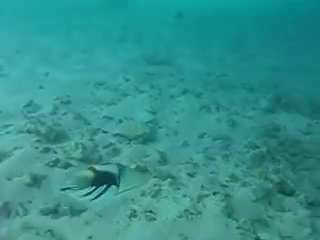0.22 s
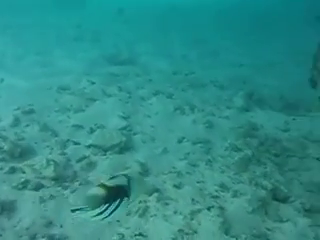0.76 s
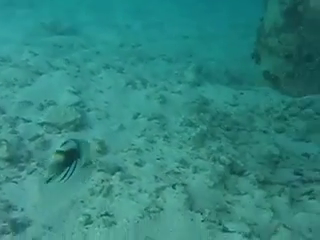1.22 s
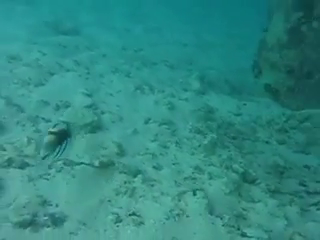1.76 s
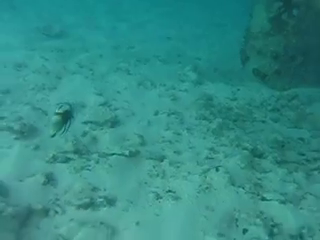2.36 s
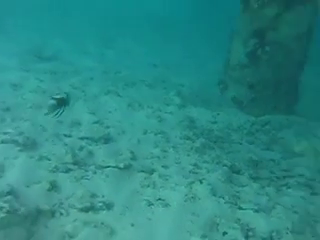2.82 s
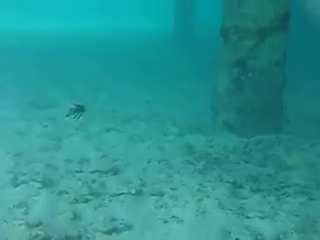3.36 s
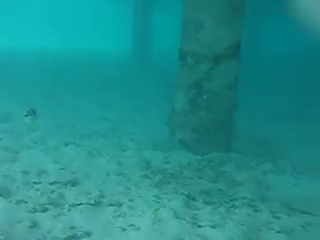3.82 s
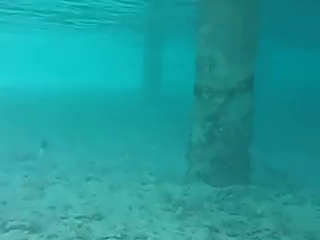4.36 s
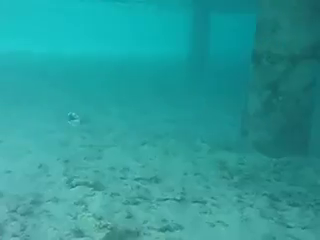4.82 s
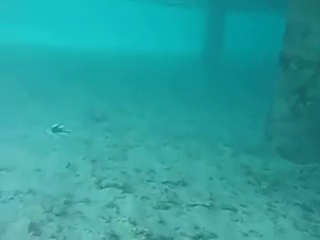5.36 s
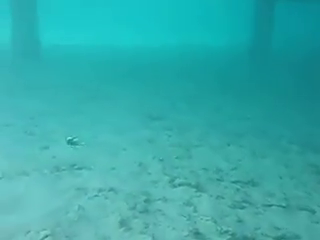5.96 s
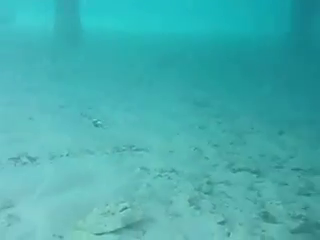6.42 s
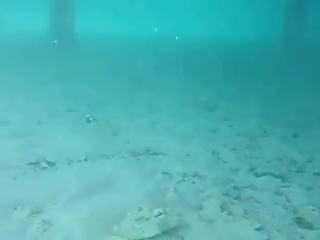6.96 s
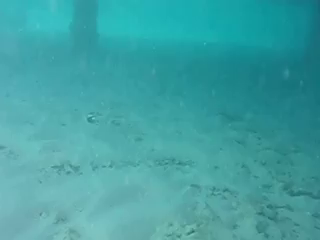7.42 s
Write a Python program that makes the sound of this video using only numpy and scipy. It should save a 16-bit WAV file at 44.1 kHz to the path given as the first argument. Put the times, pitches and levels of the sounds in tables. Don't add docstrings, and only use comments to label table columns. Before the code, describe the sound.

Close, muffled underwater sound from a microphone sealed inside a housing. Hollow knocks and soft finger slips ring briefly on a low boxy note, over faint hiss and sparse shrimp clicks. Knocks cluster between three and a half and five seconds, with one hard buckle clack. Rubbing then thickens, and after six seconds a loud fluttering gurgle fills the housing before dropping to a few taps and weak water drag.

```python
import sys
import numpy as np
from scipy import signal
from scipy.fft import rfft, irfft
from scipy.io import wavfile
from scipy.ndimage import uniform_filter1d

SR = 44100
rng = np.random.default_rng(int(sys.argv[2]) if len(sys.argv) > 2 else 0)


def file_out(sig):
    cols = np.atleast_2d(sig).T
    lim = np.clip(cols, -1, 1)
    pcm = np.round(lim * 32767).astype(np.int16)
    wavfile.write(sys.argv[1], SR, pcm)


def invert_db(level):
    return 10 ** (np.asarray(level, dtype=float) / 20)


N = 339570

# pitch_hz, level_db (per Hz)
HISS = [
    (45, -10),
    (150, 1.5),
    (500, 5.5),
    (950, -4.5),
    (2000, -6.5),
    (3600, -4.5),
    (4050, -4.5),
    (4500, -12.5),
]
# start_s, peak_db
SNAPS = [(.098, -17), (0.2547, -18.5), (1.1065, -32.5), (1.909, -31.5), (2.0866, -18), (2.156, -31.5),
         (2.5057, -17.5), (2.8949, -16.5), (3.5159, -32), (3.536, -17), (3.562, -18.5), (3.7916, -28),
         (3.7942, -24.5), (3.801, -31), (3.866, -33), (3.889, -17), (4.1168, -32), (4.2143, -18.5),
         (4.266, -35), (4.804, -34), (5.3162, -17), (5.8143, -33), (5.8713, -30.5), (5.9394, -39),
         (5.951, -28), (6.7538, -18.5), (6.804, -16.5)]
# start_s, peak_db, pitch_hz
GRIT = [(0.6823, -28.5, 1190), (0.7577, -29, 1050), (0.783, -33, 1480), (0.794, -30, 1020),
        (0.856, -21, 1100), (0.9323, -22.5, 1330), (1.017, -28, 1360), (2.0792, -27, 1220),
        (2.1203, -20, 1750), (2.758, -26, 1350), (2.775, -29, 1260), (1.555, -31, 1290), (1.62, -32, 2300),
        (1.675, -32.5, 2180), (2.839, -21.5, 1900), (3.1375, -26.5, 2320), (3.2024, -25.5, 1090),
        (3.413, -24.5, 1500), (4.309, -23.5, 1135), (4.45, -23, 1580), (0.745, -28.5, 1700),
        (1.102, -32, 1800), (1.282, -33, 1900), (3.378, -30.5, 1400), (5.375, -31, 1600),
        (5.427, -27.5, 1650), (5.813, -25, 1350), (5.93, -28.5, 1300), (5.986, -31, 1420),
        (5.866, -24, 1200), (6.643, -13, 1340),
        (0.445, -32, 1946), (0.856, -36.0, 1956.0), (0.878, -35, 1900), (0.902, -35, 1990),
        (0.971, -30, 2050), (1.616, -29, 2377.0), (1.817, -31, 2700), (2.079, -32, 2354.0),
        (2.565, -28, 2264.0), (5.953, -26, 2800), (3.126, -28, 2432.0), (3.737, -25, 2196),
        (3.791, -30, 2593.0), (4.117, -32.5, 2967.0), (4.729, -27.5, 1920), (4.778, -30.5, 2430),
        (5.654, -31.5, 2322.0), (5.872, -31.5, 2900), (6.111, -28.5, 2200), (6.122, -29.5, 2258.0),
        (6.137, -26, 2320), (6.234, -33.0, 2253.0), (6.244, -30.5, 2256.0), (6.292, -31, 2480),
        (6.335, -31, 2192.0), (6.346, -21.5, 2455.0), (6.355, -27.5, 2147.0), (3.792, -27, 1500),
        (3.7952, -27, 1600), (0.02, -27, 1000), (0.122, -29, 950)]
# start_s, peak_db, start_hz, end_hz, fade_ms (time to fall 60 dB)
BUBBLES = [
    (.301, -35.5, 2050, 1800, 30),
    (.3885, -25.5, 2280, 2050, 37),
    (1.534, -20.5, 878, 700, 100),
    (2.589, -26, 896, 797, 64),
    (2.598, -25, 1514, 1360, 52),
]
# start_s, peak_db
CLACK = (4.3443, 2.2)
# pitch_hz, level_db, fade_s (time to fall 60 dB)
CLACK_MODES = [
    (480, -2, 0.047),
    (663, -5.5, 0.039),
    (1722, -1, 0.023),
    (2865, 0.5, 0.01),
    (2050, -16, 0.014),
    (3660, -21, 0.021),
    (1200, -8, 0.015),
]
# start_s, peak_db, start_hz, end_hz, length_ms
GULPS = [(.012, -32.5, 690, 674, 15), (.338, -24.5, 736, 720, 12), (1.356, -21, 488.6, 513, 46),
         (1.815, -5.5, 556, 448, 30.5), (1.82, -32.5, 1338, 1350, 27), (2.459, -25.5, 175, 180, 29),
         (2.911, -16.5, 324, 402, 34), (2.915, -23.5, 496, 765, 25), (2.99, -34.5, 790, 875, 35),
         (3.042, -24, 265, 379, 42), (3.15, -13.5, 377, 340, 19), (3.369, -30.5, 190, 190, 15),
         (4.123, -16, 950, 950, 6.5), (3.8245, -8, 680, 636, 6.3), (5.785, -29, 108.4, 100, 12.4),
         (1.808, -16.5, 746, 694, 25.4), (6.05, -18.5, 699, 670, 50), (2.752, -25, 750, 680, 9.4),
         (7.218, -34, 156, 160, 80), (7.505, -15.5, 344.5, 283, 82), (7.569, -27, 281, 348, 76)]
# start_s, peak_db, pitch_hz,
# length_ms
THROBS = [(1.985, -10, 443, 22.4), (2.034, -13, 444, 32), (2.817, -9.5, 457, 30), (2.834, -15.5, 462, 38),
          (3.063, -5.5, 436, 21), (3.075, -5.5, 439, 21), (3.119, -7.5, 514, 40), (5.165, -11, 445, 27),
          (5.202, -12, 442, 25), (5.408, -8, 428, 38), (5.748, -7, 463, 19), (5.761, -6, 459.5, 24),
          (6.056, -6, 407, 25), (6.192, -5, 469, 17), (6.229, -4, 462, 18), (6.24, -3, 450, 20),
          (6.263, -4.5, 412, 12), (6.273, -3.5, 454, 13), (6.298, -4, 473, 33), (6.329, -8.5, 446, 11),
          (6.3625, -3.5, 432, 16), (6.394, -1, 467.5, 25), (6.4104, -2.5, 437, 11), (6.4196, -1, 449, 14),
          (6.451, -1, 451, 24), (6.487, -3.8, 475, 14), (6.501, -3.5, 422, 16), (6.521, -1, 450, 12),
          (6.5285, -0.4, 464, 11), (6.552, -2.5, 431, 18), (6.587, -11, 495, 20), (6.602, -1.5, 464, 18),
          (6.669, -3.6, 444, 29), (6.7, -2.5, 470, 24), (6.739, -3.5, 481, 20.6), (6.7527, -1.6, 458.5, 22),
          (0.033, -17, 438, 13.5), (0.156, -18, 440.0, 13.4), (0.287, -20.5, 464, 25),
        (0.785, -16.5, 513, 17), (0.935, -10, 492, 11.3), (1.373, -13.5, 482, 21.7), (1.658, -19, 519, 27),
        (1.77, -18.5, 510, 10.4), (1.943, -17.5, 469, 18), (1.972, -18, 435, 12), (2.118, -18, 456, 14),
        (2.146, -22, 430, 18), (2.178, -24, 460, 18), (2.384, -14.5, 449, 18), (2.464, -11, 444, 17),
        (2.503, -11, 425, 18), (2.566, -8.5, 438, 16.7), (2.589, -10.5, 443, 12.0),
        (2.609, -12.5, 415.0, 18.4), (2.896, -20.5, 456, 13), (3.028, -13, 466, 17),
        (3.177, -13.5, 414, 15), (3.273, -8.5, 460, 14.4), (3.292, -13, 451, 25.0),
        (3.596, -17, 488.0, 12.4), (3.631, -16.0, 480, 17), (4.069, -13.5, 480, 17), (4.291, -20, 493, 27),
        (4.496, -20, 455, 28), (4.885, -17, 478, 28), (5.342, -17.5, 446, 27), (5.728, -11.5, 464, 8.8),
        (5.787, -8, 494, 15), (5.907, -21, 477, 18), (6.127, -7.5, 466, 14.4), (6.165, -4.5, 446, 9.9),
        (6.347, -3, 424, 19.0), (6.638, -6, 430, 24), (6.722, -10, 451, 22), (6.821, -9.5, 462, 15.0),
        (7.028, -13, 483, 35), (7.066, -18, 495.0, 11), (7.16, -16.5, 480, 41), (7.254, -14, 464, 16.4),
        (7.549, -6, 463, 17), (7.657, -19.5, 430, 30)]
# start_s, peak_db, pitch_hz, length_ms
LUMPS = [(0.176, -30, 203.0, 11), (0.811, -24.5, 199, 14), (1.376, -27, 246, 13), (1.822, -16, 223.6, 14),
         (3.04, -27.5, 272, 69), (3.174, -28, 213.0, 12), (3.672, -27, 244, 25), (4.511, -22, 178.0, 10),
         (4.529, -27, 196, 15), (5.464, -28.5, 274, 48), (5.59, -28.5, 243, 11), (5.788, -25, 220, 14),
         (6.093, -28, 254, 26), (6.12, -29.5, 262, 38), (6.288, -21, 224.0, 11), (6.508, -29.5, 230.5, 14),
         (6.533, -20.5, 235.0, 18.0), (6.63, -24.5, 263.0, 41), (6.686, -24, 250.0, 20),
         (6.746, -26, 237, 30), (6.83, -25.5, 206.0, 11), (7.611, -28.5, 254.0, 36)]
# start_s, peak_db, length_ms
FLARES = [(0.762, -20.5, 15.5), (0.778, -25.5, 12.6), (0.9, -19, 13), (0.921, -15, 11.5),
          (1.372, -26.5, 16), (1.567, -25.5, 11.5), (1.657, -25, 13.5), (2.555, -18.5, 37),
          (2.895, -24, 9.9), (2.987, -26.5, 28), (3.065, -18, 13), (3.123, -28.0, 13), (3.319, -21, 16),
          (3.778, -22, 14), (4.138, -27.5, 11), (4.439, -27, 31), (4.472, -28, 16), (4.632, -21.5, 12),
          (4.773, -19.5, 15), (5.346, -29, 12), (5.37, -23, 16), (5.393, -22, 16), (5.429, -21, 13),
          (5.469, -19, 13), (5.573, -19.5, 42), (5.604, -28, 9.5), (5.711, -26, 18), (5.739, -26, 35),
          (5.811, -16.5, 27), (5.869, -24, 13.0), (6.036, -31.5, 27.0), (6.205, -19, 47), (6.232, -18, 33),
          (6.285, -22.5, 43), (6.315, -21.5, 19), (6.488, -18.5, 36), (6.523, -17, 16), (6.686, -24, 16),
          (6.699, -18.5, 20), (7.119, -28, 8.1), (7.421, -22, 16)]
# pitch_hz, width_hz, level_db
POCKET = [
    (463.2, 55.3, 1),
    (415, 75.7, -1.5),
    (676, 51, -15),
    (316.4, 26, -16.5),
    (810, 9.4, -33),
]
# pitch_hz, width_hz, level_db
SHELL = [
    (1114, 67, 6.5),
    (1340, 300, 4),
    (1484, 78, 6.5),
    (2013, 100, -1.5),
    (2420, 50, -12),
    (1900, 1800, -8),
]
# start_s, length_s, pocket_db, rasp_db
STROKES = [(0.0, 0.11, -35, -60.5), (0.207, 0.02, -32.5, -64.5), (0.34, 0.21, -36, -67.5),
           (0.726, 0.18, -23.5, -48), (0.967, 0.14, -32, -61), (1.295, 0.053, -39, -62),
           (1.455, 0.16, -33.5, -53), (1.782, 0.051, -19.5, -55), (1.886, 0.39, -30.5, -56),
           (2.345, 0.15, -27, -62), (2.443, 0.12, -26, -52.5), (2.742, 0.028, -24.5, -64),
           (2.925, 0.16, -20.5, -59.5), (3.082, 0.21, -23.5, -57), (3.364, 0.31, -32, -64),
           (3.822, 0.3, -32.5, -60.5), (4.01, 0.12, -22, -50.5), (4.192, 0.11, -38, -50.5),
           (4.398, 0.16, -31.5, -51.5), (4.61, 0.24, -29, -52.5), (4.82, 0.43, -26.5, -57),
           (5.277, 0.082, -23.5, -55.5), (5.359, 0.26, -17, -42), (5.658, 0.12, -18.5, -48),
           (5.74, 0.12, -20.5, -48.5), (6.016, .12, -17, -39.5), (6.152, 0.19, -9.5, -36.5),
           (6.368, 0.36, -11, -39.5), (6.748, 0.035, -27, -52), (6.94, 0.44, -27, -56.5),
           (7.487, 0.09, -17, -56.5)]
# start_s, length_s, level_db
HUM_SPELL = (6.92, 0.46, -55.5)
BLIP_HZ = (950, 1350, 1900, 2370)
# start_s, peak_db, ring_hz, thump_db, tick_db
KNOCKS = [(0.1421, -1.5, 449.4, -3, -18), (.443, 2, 429, -25.5, -11.5), (0.479, -6.5, 464, -21, -48),
          (.829, -1, 455, -39, -4.5), (.883, -2.5, 506, -41, -15), (1.812, -1.5, 502, -30.5, -27),
          (2.564, -22.5, 414, -40, -20), (3.069, -17.5, 430, -35, -44), (3.612, -0.5, 476, -5.5, -12),
          (3.733, 0, 452, -10, -9.5), (3.782, -8, 513, -8, -26), (3.825, 0.5, 441, -51, -10),
          (4.128, -2.5, 452, -26, -36), (4.579, -10, 480, -14.5, -49), (4.597, 3, 467, -19, -12.5),
          (4.624, -9.5, 480, -29, -43), (4.636, -5, 481, -5.5, -19.5), (4.665, -6, 512, -15.5, -32),
          (4.696, -4, 487, -8, -37), (4.719, -2.5, 426, -16.5, -26), (4.733, -1.5, 460, -4, -17),
          (4.778, -0.5, 493, -6, -24.5), (4.814, 2, 480, -43, -7.5), (5.103, -2, 452.4, -13, -21),
          (5.868, -6, 422, -32, -22)]
# start_s, peak_db, ring_hz
SLIPS = [(.344, -14.5, 466), (1.022, -13, 461), (1.462, -19, 518), (1.535, -12, 476), (1.721, -18.5, 532),
         (1.975, -17.5, 405), (2.042, -23, 466), (2.075, -12.5, 471), (2.37, -16.5, 446),
         (2.453, -22.5, 427), (2.779, -10.5, 473), (2.898, -20.5, 450), (2.917, -11.5, 493),
         (3.276, -9.5, 460), (4.074, -20, 459), (4.198, -9.5, 458), (4.503, -20.5, 467),
         (5.013, -13.5, 430), (5.348, -9.5, 400), (5.541, -7.5, 440), (6.938, -12.5, 454),
         (7.011, -6.5, 474), (6.167, -16.5, 530), (7.083, -12, 463), (1.28, -20, 536), (.234, -31, 490),
         (.012, -16.5, 463)]
# start_s, peak_db, ring_hz
TAPS = [(.213, -17, 540), (.75, -8.5, 520), (.86, -7.5, 520), (.977, -12, 428), (1.102, -16.5, 524),
        (1.6215, -6.5, 537), (2.756, -7.5, 415), (3.988, -15, 512), (4.039, -7.5, 472), (5.952, -10.5, 463),
        (7.122, -5, 480), (7.304, -31, 520), (7.42, -7.5, 471)]
# start_s, peak_db, ring_hz
BUMPS = [
    (.035, -18.5, 464),
    (.069, -14, 490),
    (.522, -13.5, 415),
    (3.716, -15, 519),
    (7.256, -26.5, 485),
    (7.484, -10.5, 435),
    (7.509, -20, 467),
]

# thump_db and tick_db (both relative to the ring), push_ms
SLIP, TAP, BUMP = (-35.5, -38, 8.52), (-37.5, -19.5, 4.04), (-9, -27, 3.4)
KNOCK_PUSH_MS = 2.96
UPPER_HZ = 674
STROKE_FADE_DB_PER_S = 137
SHORT = np.arange(SR // 10) / SR
CLOCK = np.arange(0, N / SR + .001, .001)


def level(x, db):
    return x * invert_db(db) / np.sqrt(np.mean(x ** 2))


def smooth_twice(x, size):
    return uniform_filter1d(uniform_filter1d(x, size), size)


def walk(rate):
    hold = int(SR / rate)
    steps = np.repeat(rng.standard_normal(N // hold + 1), hold)
    return 2.0 * smooth_twice(steps, hold)[:N]


def add(out, s, x):
    i = int(s * SR)
    out[i:i + len(x)] += x[:N - i]


def band(x, hz, width):
    return signal.lfilter(*signal.iirpeak(hz, hz / width, SR), x)


def band_twice(x, hz, width):
    return band(band(x, hz, width), hz, width)


def body(x, modes, patchy_db):
    out = np.zeros(N)
    for hz, width, db in modes:
        out += invert_db(db + patchy_db * walk(22)) * band_twice(x, hz, 1.22 * width)
    return out


def ring(hz, t60, push_s, phase=0.):
    push = np.sin(np.pi * np.clip(SHORT / push_s, 0, 1)) ** 2
    swell = signal.lfilter([1], [1, -invert_db(-60 / (t60 * SR))], push)
    return -swell / swell.max() * np.sin(2 * np.pi * hz * SHORT + phase)


def slips(per_s, scatter_db):
    chance = rng.random((3, N))
    sizes = invert_db(-scatter_db * np.log(1 - chance[1])) * np.sign(chance[2] - .5)
    return np.where(chance[0] < per_s / SR, sizes, 0)


def spells(rows, fade_db_per_s):
    s, length, db = np.transpose(rows)[:, :, None]
    since = CLOCK - s
    rise = np.clip(since / 0.036, 0, 1)
    fall_db = np.clip(fade_db_per_s * (since - length), 0, 90)
    gain = rise * invert_db(db - fall_db)
    return np.interp(np.arange(N) / SR, CLOCK, gain.sum(axis=0))


def steady(x, s):
    return x / smooth_twice(x ** 2, int(s * SR)) ** .35


def swing(x):
    return np.sqrt(2 * smooth_twice(x ** 2, SR // 230) + 1e-12)


def reined(x, struck):
    swing_top, yield_at = 0.47, 0.37
    limited = x / (1 + (swing(x) / swing_top) ** 4) ** 0.46
    return limited / (1 + (swing(struck) / yield_at) ** 2)


def hiss():
    hz, db = np.transpose(HISS)
    bins_hz = np.fft.rfftfreq(N, 1 / SR)
    colour = invert_db(np.interp(np.log(bins_hz + 1), np.log(hz), db)) * (bins_hz < 4580)
    return level(irfft(rfft(rng.standard_normal(N)) * colour, N), -46.5)


def snaps():
    out, chance = np.zeros(N), rng.standard_normal(len(SNAPS))
    snap_hz, snap_spread, snap_t60_ms, grit_t60_ms = 3577, .02, 5.3, 5.5
    rows = [(s, db, snap_hz * (1 + snap_spread * c), snap_t60_ms) for (s, db), c in zip(SNAPS, chance)]
    rows += [(*row, grit_t60_ms) for row in GRIT]
    for s, db, hz, t60_ms in rows:
        t60 = t60_ms / 1000
        bright = ring(hz, t60, 0.00079)
        dull = invert_db(-13.5) * ring(.45 * hz, 1.2 * t60, 0.0003)
        add(out, s, invert_db(db) * (bright + dull))
    reef = level(band(slips(45, scatter_db=2.8), 2300, 2600), -60)
    return out + reef


def bubbles():
    out, flutter = np.zeros(N), invert_db(3 * walk(250))
    for s, db, start_hz, end_hz, ms in BUBBLES:
        along = SHORT / (ms / 1000)
        hz = end_hz + (start_hz - end_hz) * np.exp(-2 * along)
        gain = invert_db(db - 60 * along) * np.tanh(SHORT / 0.00078)
        add(out, s, gain * np.sin(2 * np.pi * np.cumsum(hz) / SR))
    return out * flutter


def clack():
    out = np.zeros(N)
    start_s, peak_db = CLACK
    modes = sum(invert_db(db) * ring(hz, t60, 0.00088) for hz, db, t60 in CLACK_MODES)
    add(out, start_s, invert_db(peak_db) * modes)
    return out


def gulps():
    out, air = np.zeros(N), walk(200)
    rows = GULPS + [(s, db, hz, hz, ms) for s, db, hz, ms in THROBS + LUMPS]
    rows += [(s, db, UPPER_HZ, UPPER_HZ, ms) for s, db, ms in FLARES]
    for s, db, start_hz, end_hz, ms in rows:
        along = np.clip(SHORT / (ms / 1000), 0, 1)
        hz = start_hz + (end_hz - start_hz) * along
        wavers = abs(start_hz - 480) > 100
        waver = 1 + .034 * air[int(.9 * s * SR):][:len(SHORT)] * wavers
        swell = np.sin(np.pi * along ** 0.83) ** 2
        add(out, s, invert_db(db) * swell * np.sin(2 * np.pi * np.cumsum(hz * waver) / SR))
    return out


def slosh(press):
    stir_rows = [(s, .02, thump_db - 37.5) for s, _, _, thump_db, _ in KNOCKS]
    stir = spells(stir_rows, fade_db_per_s=112)
    water = band_twice(rng.standard_normal(N), 170, 220) * invert_db(3.0 * walk(25))
    return level(water, 0) * (invert_db(-49) + invert_db(-41) * press + stir)


def blips(press):
    width = .13
    out = sum(band(band(slips(13, scatter_db=3), hz, width * hz), hz, 2 * width * hz) for hz in BLIP_HZ)
    return level(out, -32.5) * np.sqrt(press * invert_db(-24.0))


def shell_rasp(force, press):
    scrape = spells([(s, length, db) for s, length, _, db in STROKES], STROKE_FADE_DB_PER_S)
    shell = steady(body(steady(force, 0.0027), SHELL, patchy_db=1.5), 0.011)
    bent = np.arange(N) + .003 * SR * walk(4)
    rasp = level(np.interp(bent, np.arange(N), shell), -1.5) * scrape
    rasp = rasp + band(rasp, 2500, 410) * scrape / invert_db(-40)
    hum = level(steady(band_twice(force, 1350, 120), 0.044), 0)
    flow = invert_db(-40) * press + spells([HUM_SPELL], STROKE_FADE_DB_PER_S)
    return rasp + hum * flow


def drag(struck):
    still_db = -39
    strokes = spells([(s, length, db) for s, length, db, _ in STROKES], STROKE_FADE_DB_PER_S)
    press = invert_db(still_db) + strokes
    force = slips(2500, scatter_db=2.5) * invert_db(3.0 * walk(55))
    muffle = signal.butter(6, 840, fs=SR, output="sos")
    pocket = signal.sosfilt(muffle, body(force, POCKET, patchy_db=1.5))
    pocket = level(steady(pocket, 0.02), 0) * press
    return reined(pocket, struck) + blips(press) + shell_rasp(force, press) + slosh(press)


def blows():
    ring_t60_s, thump_t60_s, tick_t60_s = 0.031, .03, .007
    thump_hz, tick_hz, tick_lag_s = 190, 1190, .0008
    rows = [(*row, KNOCK_PUSH_MS) for row in KNOCKS]
    for table, (thump_db, tick_db, push_ms) in ((SLIPS, SLIP), (TAPS, TAP), (BUMPS, BUMP)):
        lead_s = .55 * max(push_ms - KNOCK_PUSH_MS - 1, 0) / 1000
        rows += [(s - lead_s, db, hz, db + thump_db, db + tick_db, push_ms) for s, db, hz in table]
    out, chance = np.zeros(N), rng.standard_normal((len(rows), 3))
    for (s, db, hz, thump_db, tick_db, push_ms), (a, b, c) in zip(rows, chance):
        push_s = push_ms / 1000
        x = invert_db(db) * ring(hz, ring_t60_s, push_s, phase=0.53 * a)
        x = x + invert_db(db - 14.5) * ring(UPPER_HZ, ring_t60_s * 0.69, push_s)
        x = x + invert_db(thump_db) * ring(thump_hz * (1 + 0.021 * b), thump_t60_s, push_s)
        add(out, s, x)
        this_tick_hz = tick_hz * (1 + .12 * c)
        tick = ring(this_tick_hz, tick_t60_s, 0.0012)
        tick = tick + invert_db(-13.0) * ring(2.5 * this_tick_hz, tick_t60_s, 0.00025)
        add(out, s + tick_lag_s, invert_db(tick_db - 1.5) * tick)
    return out


def scene():
    struck = blows() + gulps()
    shaken = drag(struck) + struck + snaps() + clack() + bubbles()
    seal = signal.butter(2, 68, "high", fs=SR, output="sos")
    return (signal.sosfilt(seal, shaken) + hiss())[None]


def roll_off(x):
    return signal.sosfilt(signal.butter(12, 15900, fs=SR, output="sos"), x)


def record(dry):
    knee, sharpness = .724, 26.0
    rounded = dry / (1 + np.abs(dry / knee) ** sharpness) ** (1 / sharpness)
    top_hz, ceiling, offset = 4000, .714, -.0028
    edge = signal.cheby2(9, 60, 1.28 * top_hz, fs=SR, output="sos")
    narrow = signal.sosfilt(edge, rounded)
    mix = np.clip(narrow + offset, -ceiling, ceiling)
    return roll_off(mix)


dry = scene()
out = record(dry)
file_out(out)
```